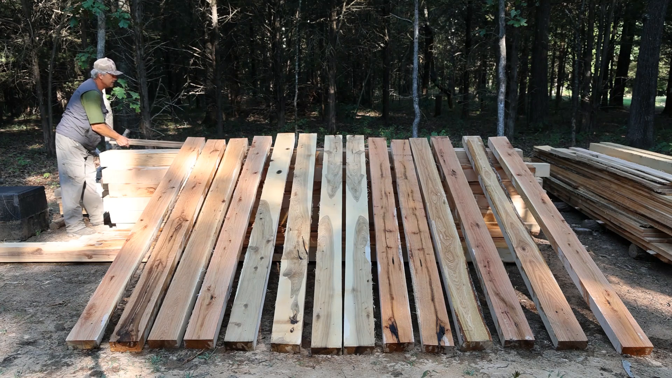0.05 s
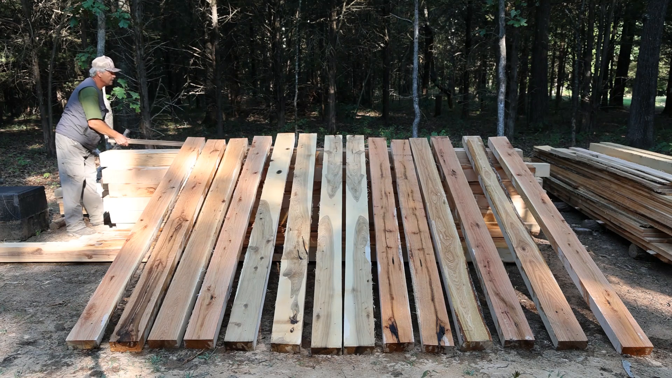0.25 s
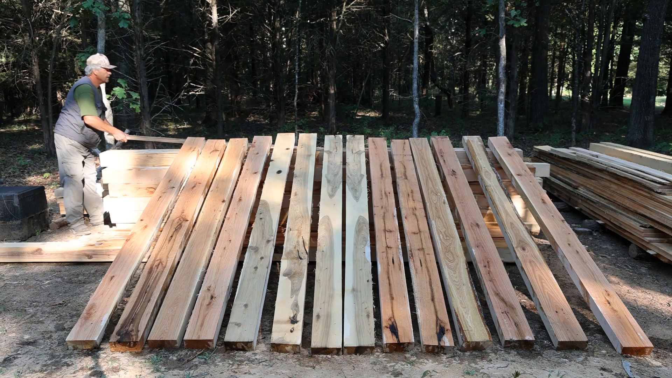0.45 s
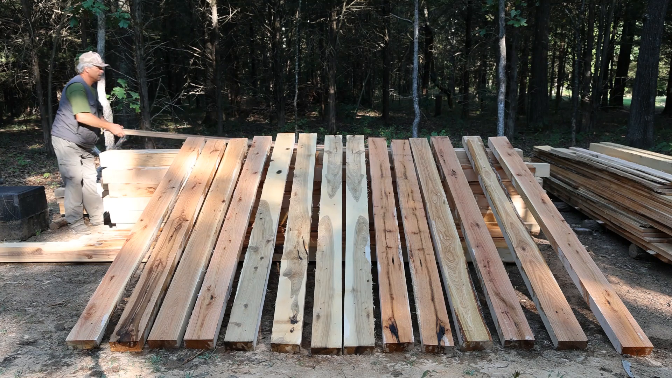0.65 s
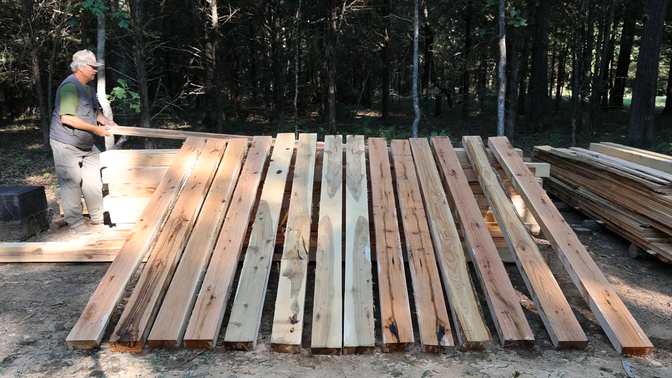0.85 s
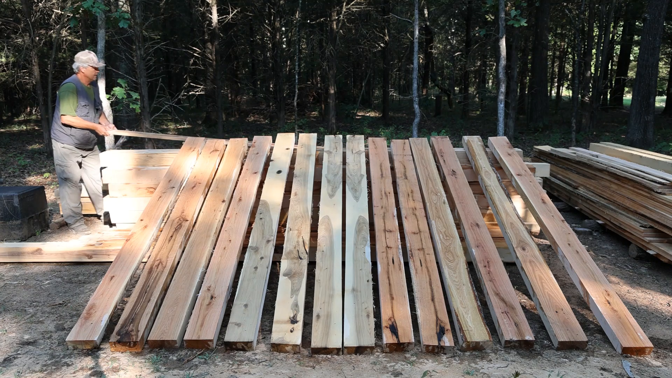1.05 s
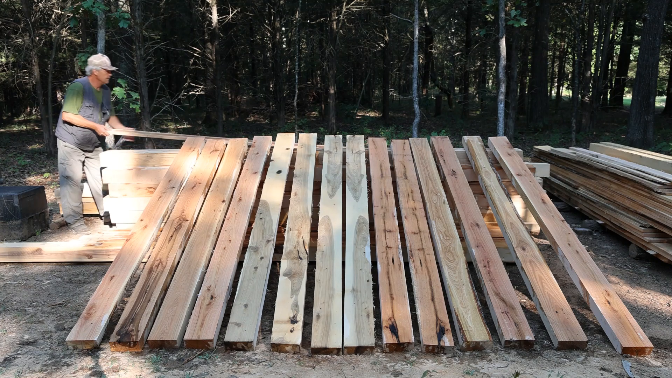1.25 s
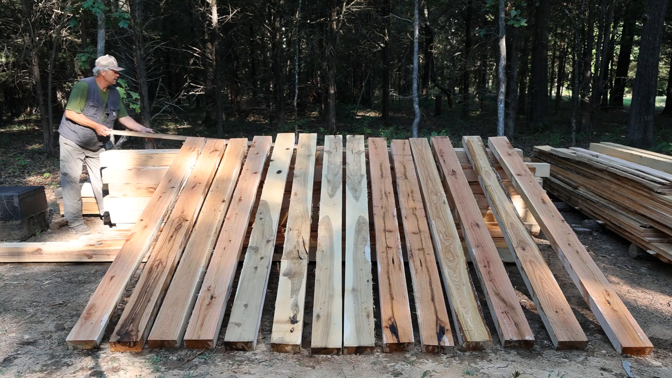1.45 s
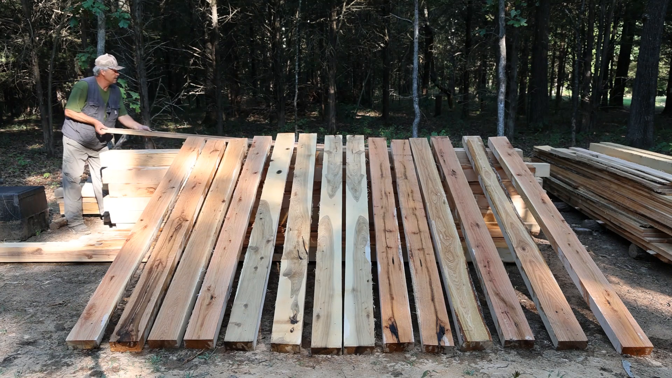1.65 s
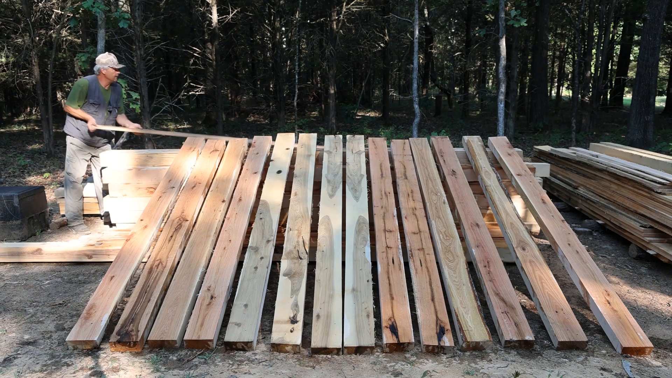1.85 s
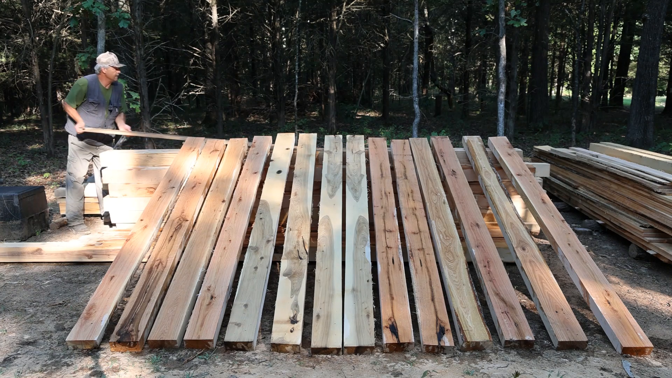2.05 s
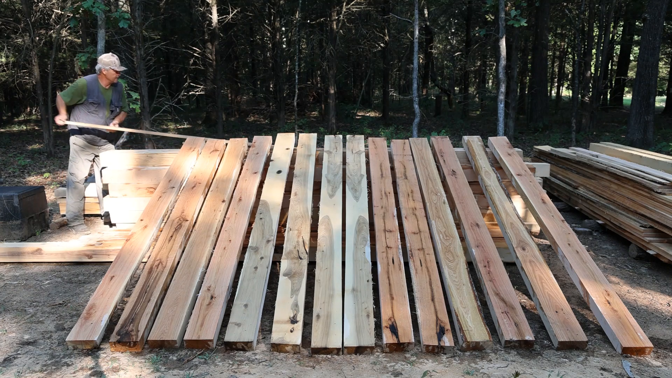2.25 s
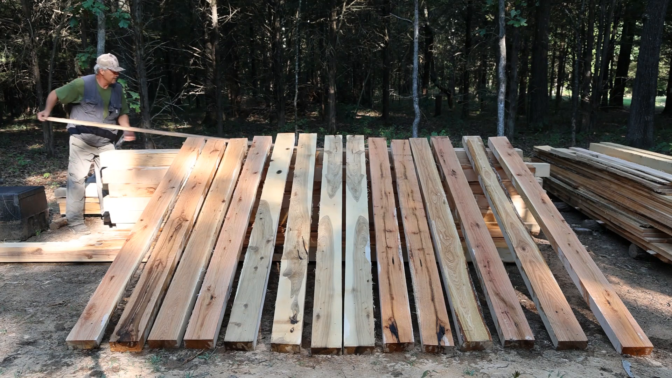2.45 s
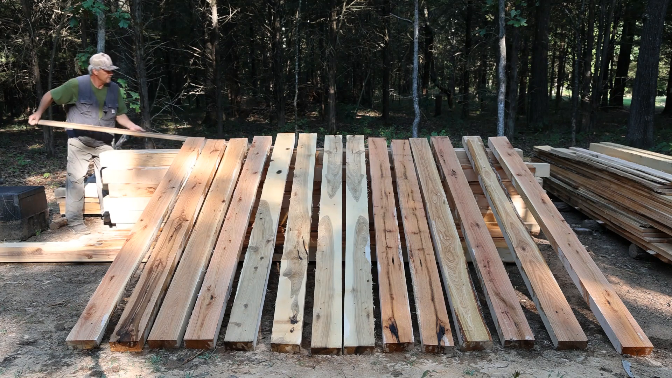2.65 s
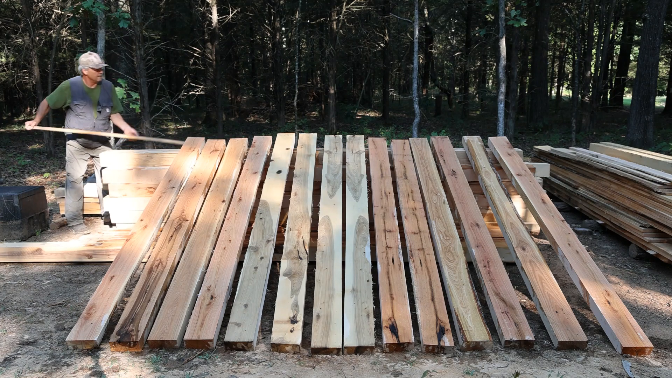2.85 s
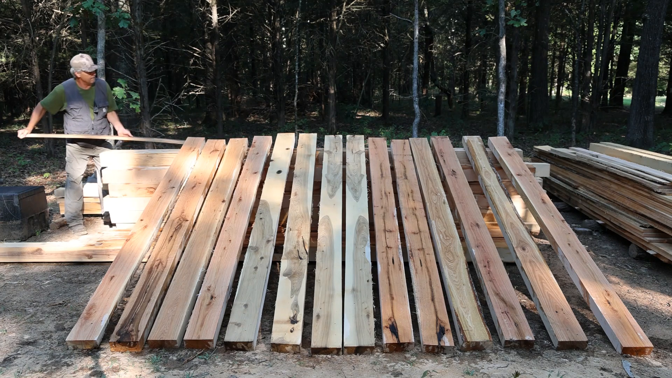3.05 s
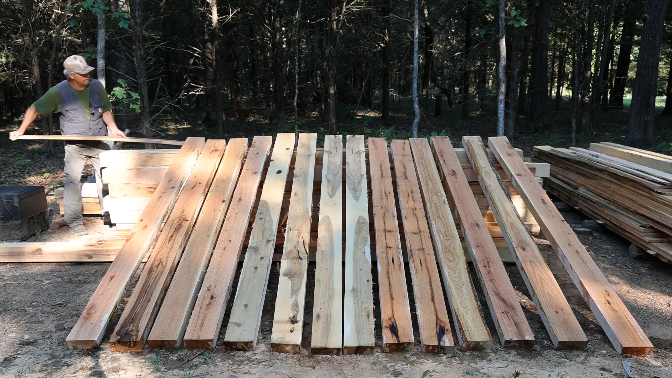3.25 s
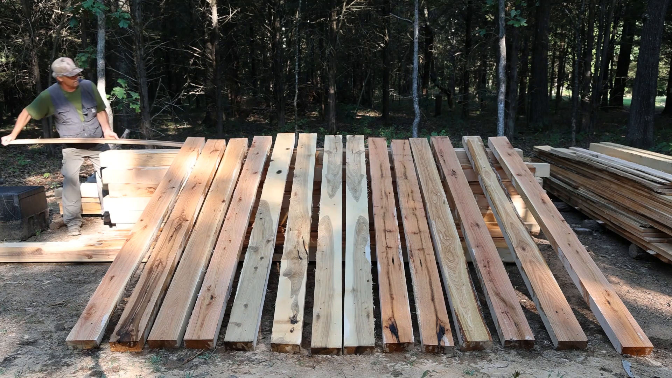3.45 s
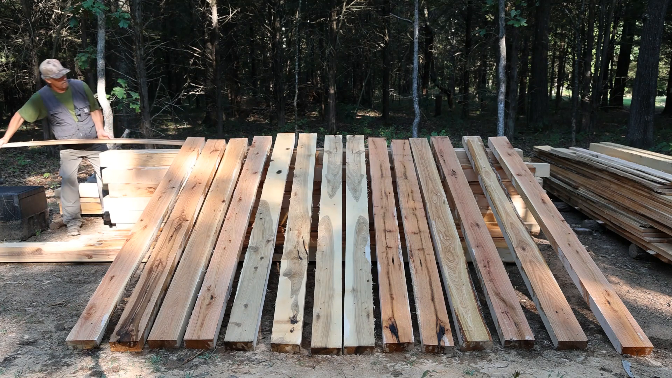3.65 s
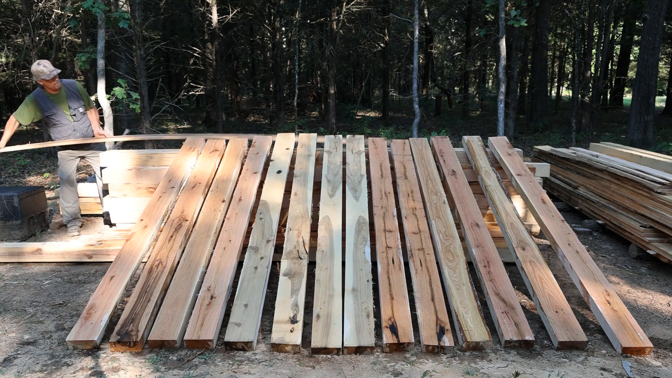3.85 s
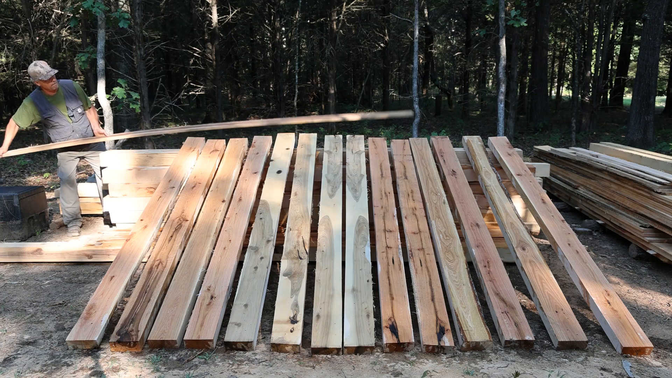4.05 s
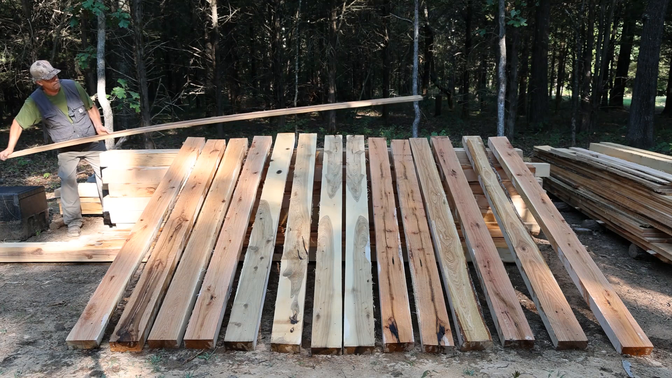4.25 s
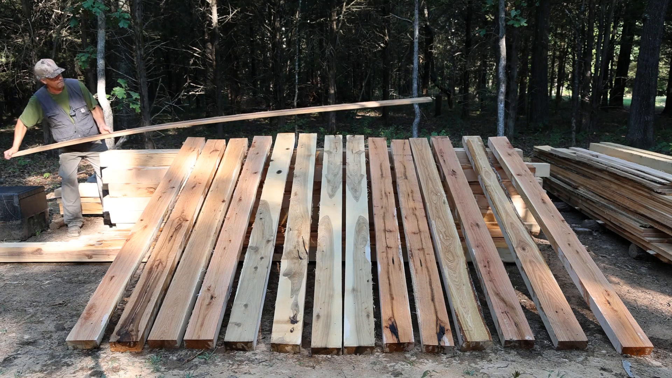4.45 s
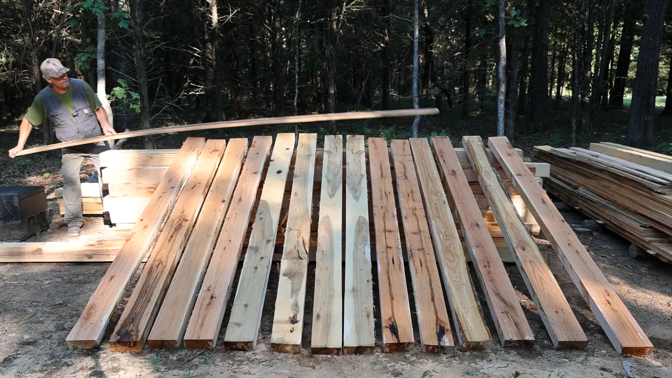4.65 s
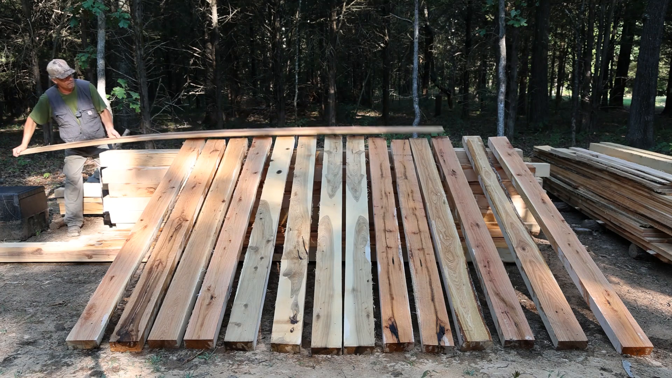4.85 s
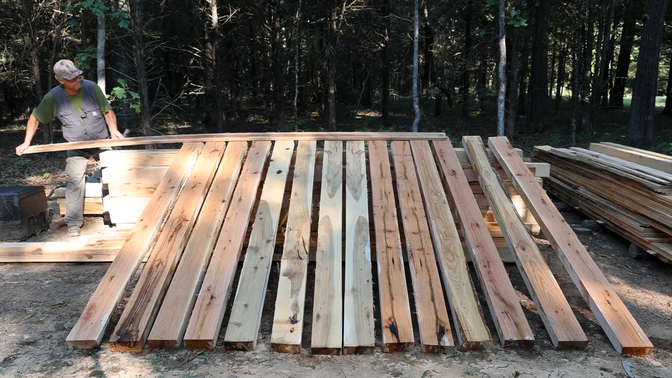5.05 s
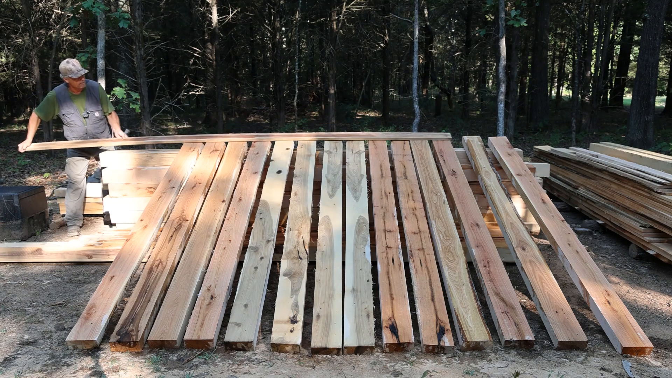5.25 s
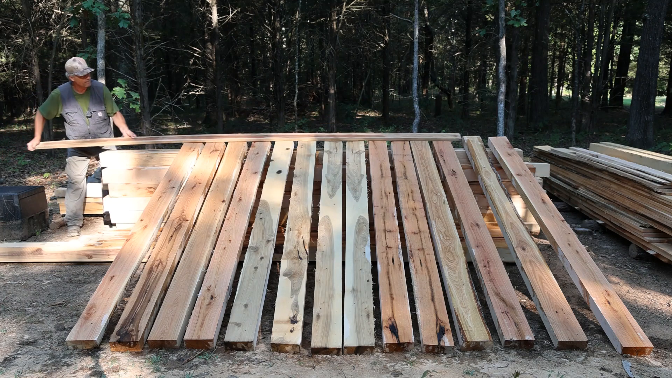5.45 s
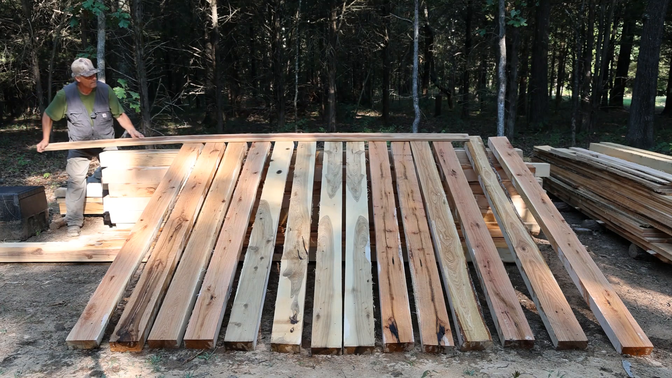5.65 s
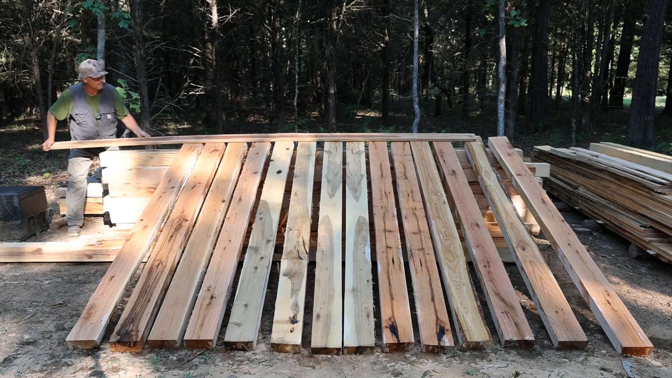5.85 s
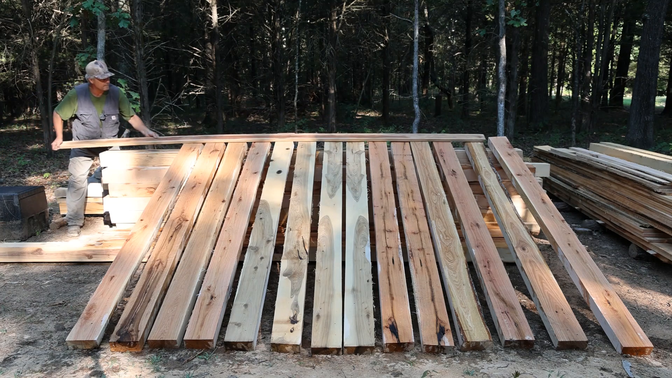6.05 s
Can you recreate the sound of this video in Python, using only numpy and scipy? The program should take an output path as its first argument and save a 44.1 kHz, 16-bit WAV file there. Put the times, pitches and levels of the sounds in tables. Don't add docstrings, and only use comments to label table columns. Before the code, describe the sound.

Faint handling taps come first, among buzzing cicadas. Then a plank is pulled across a lumber stack with gritty scraping, and a sharp loud clack lands, followed by more rasping and a second, heavier clattering bang. Handling grows quiet while insects swell again; a third knock bounces woodenly and ends in a drawn-out drag. Open air at a forest edge, one microphone, little reverberation, soft insect echo from the trees.

```python
import sys
import numpy as np
from scipy import signal
from scipy.fft import rfft, irfft, next_fast_len
from scipy.io import wavfile
from scipy.ndimage import uniform_filter1d, map_coordinates

SR = 44100
rng = np.random.default_rng(int(sys.argv[2]) if len(sys.argv) > 2 else 0)


def generate_wav(sig):
    pcm = np.round(np.clip(np.atleast_2d(sig).T, -1, 1) * 32767).astype(np.int16)
    wavfile.write(sys.argv[1], SR, pcm)


def volts_from_decibels(level):
    exponent = np.asarray(level, float) / 20
    return 10 ** exponent


N = 269274
TIME_S = np.arange(N) / SR

OVERHANG_CHANGES_S = [2.6, 4.0]
# time in seconds, speed as level in dB, weight on the stack in dB.
STROKES = [
    [(1.62, -64.5, -6), (1.69, -53, -2), (1.76, -48, 2), (1.83, -48, 3.5), (1.875, -54.5, 12),
     (1.95, -48, 7), (2.0, -49, 0), (2.05, -50, -2)],
    [(2.05, -53, -12), (2.09, -39, -7), (2.16, -45, -1.5), (2.26, -45.5, -5), (2.33, -44, 4),
     (2.41, -41.5, -7), (2.52, -44.5, 0), (2.66, -50.5, 0.5), (2.76, -57.5, 1), (2.835, -56.5, 9)],
    [(2.86, -58, -5), (2.92, -46.5, 24), (2.96, -41, -5), (3.0, -37.5, -16), (3.05, -41.5, -4),
     (3.1, -51.5, 2), (3.15, -55, 1)],
    [(5.08, -52, 10), (5.17, -57.5, 21), (5.24, -46.5, -2), (5.4, -46.5, -5), (5.56, -42, -4.5),
     (5.64, -39, -2), (5.8, -46.5, -1.5), (5.9, -42, -5), (6.11, -39, -6.5)],
]
# time in seconds, speed as level in dB, weight in dB.
SHIFTS = [
    [(.5, -73, 2), (.6, -65.5, -6), (.8, -57.5, 3), (.92, -83, 0.5)],
    [(3.44, -60.5, -2), (3.55, -56.5, 0), (3.66, -58, 3.5), (3.78, -68, 8)],
]


def strokes(overhang):
    own = []
    for rows in sorted(STROKES + SHIFTS):
        if np.searchsorted(OVERHANG_CHANGES_S, rows[0][0]) == overhang:
            own.append(rows)
    s, _, weight_db = np.transpose(np.vstack(own))
    speed = sum(volts_from_decibels(in_time(rows)[0]) for rows in own)
    return speed, np.interp(TIME_S, s, weight_db)


# frequency in Hz, width in Hz, level in dB.
HISS_MODES = [
    [(591, 80, -4), (756, 147, -2.5), (920, 134, -1), (1000, 61, 1), (1226, 270, -6)],
    [(625, 290, -2), (863, 194, 1), (1050, 240, -0.5), (1400, 170, -13)],
    [(554, 130, -6), (702, 54, 2), (800, 106, 0), (940, 65, 1), (1075, 94, 1), (1400, 480, -6)],
]
RUMBLE_MODES = [
    [(110, 19, 2.5), (189, 45, -2), (284, 40, -3.5), (400, 48, -4)],
    [(70, 48, 2.5), (200, 140, -2), (350, 71, -6.5)],
    [(204, 47, -2), (303, 36.6, 1.5), (450, 78, -7)],
]
RASP_MODES = [
    [(1540, 125, 2), (1730, 102, 4.5), (1920, 190, 4.5), (2290, 730, 2), (2960, 1050, -2.5)],
    [(1600, 240, 0.5), (2000, 270, 0), (2520, 560, -6)],
    [(1667, 170, 0.33), (1990, 360, 0.79), (2560, 340, -0.74)],
]
RASP_DB = [0.5, -4.5, -7]
RUB_DB = [-4, -4, -5]
# frequency in Hz, density in dB per Hz.
RUB_SPECTRUM = [(60, -29), (120, 0.5), (300, -2), (600, -6), (1500, -8.5), (2300, -13), (3000, -8),
                (4200, -12.5)]


def slides(motion):
    rasp_loss = 0.063
    fibres = foliage(grit(5000, 1.6) * volts_from_decibels(drift(45)), depth_db=.8, spacing_hz=120, per_s=5)
    rub = uniform_filter1d(sum(volts_from_decibels(db) * speed for db, (speed, _) in zip(RUB_DB, motion)), 3000)
    out = rub * coloured(np.roll(fibres, SR), RUB_SPECTRUM)
    for (speed, weight_db), hiss_modes, rumble_modes, rasp_modes, rasp_db in zip(
            motion, HISS_MODES, RUMBLE_MODES, RASP_MODES, RASP_DB):
        hiss = resonate(resonate(fibres, hiss_modes), hiss_modes)
        rumble = volts_from_decibels(weight_db) * resonate(fibres, rumble_modes)
        rasp = resonate(resonate(fibres, rasp_modes), rasp_modes)
        out = out + speed * (hiss + rumble)
        out = out + speed * volts_from_decibels(rasp_db - rasp_loss * weight_db) * rasp
    return out


# start in seconds, peak level in dB, crack pitch in Hz,
# ring relative to peak in dB, thud relative to peak in dB.
DROPS = [(1.8891, 7, 1920, -23.5, -30), (1.9025, -9, 1000, -15.5, -13.5), (2.018, -21.5, 730, -17, -36),
         (2.037, -29, 503, -16, -3), (2.8358, 6, 1620, -21.5, -19.5), (2.8356, -10.5, 3010, -16, -31),
         (2.8445, -14, 1980, -17.5, -9), (2.851, -19, 856, -9.5, -12), (2.876, -14, 800, -24, -6.5),
         (2.8822, -16.5, 1900, -16, -10), (2.8945, -9.5, 940, -18, -14), (2.9478, -6, 960, -26, -19.5),
         (4.998, -7, 1320, -16, -19), (5.001, 3, 1144, -20, -45), (5.010, -6, 1000, -10.5, -15),
         (5.0222, -3.5, 1160, -18, -12.5), (5.041, -19, 911, -7.5, -14), (5.138, -31.5, 1050, -6, 0),
         (5.149, -16.5, 653, -22, -10), (5.253, -28.5, 230, -18, -7)]
# start in seconds, peak level in dB, crack pitch in Hz,
# ring relative to peak in dB, thud relative to peak in dB.
TAPS = [(0.572, -38, 493, -12, -7), (0.779, -43.5, 700, -7, -11), (.83, -48, 706, -10, 2),
        (0.949, -58, 500, -14, 1), (1.84, -23.5, 1970, -25.5, -39), (1.867, -27, 1900, -24, -22),
        (2.079, -50, 900, -8, -13), (2.288, -38, 1790, -7, -35), (2.434, -34, 970, 5, -41),
        (2.45, -28.5, 1110, -9.5, -16), (2.774, -28, 1000, -17, -7.5), (3.233, -32.5, 1400, -16, -5.5),
        (3.457, -27.5, 161, -14, -5), (3.652, -54.5, 400, 0, 2), (4.149, -45.5, 896, -15, -4.5),
        (5.614, -27.5, 920, -12.5, -5)]
# start in
# seconds, peak level in dB, crack pitch in Hz, ring relative to peak in dB, thud relative to peak in dB.
RATTLE = [(2.856, -24, 1900, -20, -15), (2.863, -19.5, 610, -9, -4.5), (2.872, -22.5, 300, -13, -2.5),
          (2.8838, -12, 624, -14, -10), (2.909, -23, 905, -14, -7), (2.919, -22, 610, -20, -13),
          (2.932, -36, 350, -14, -12), (5.016, -11, 535, -10, -20), (5.031, -13, 800, -19, -16),
          (5.052, -26, 1000, -18, -10), (5.068, -23.5, 700, -19, -0.5), (5.086, -26.5, 400, -11, -1),
          (5.097, -33, 350, -10, -7), (5.122, -32, 450, -5, 0), (5.156, -25.5, 450, -14, -5),
          (5.168, -28.5, 600, -11.5, -5), (5.196, -33, 305, -15, 1), (3.487, -35, 151, -20, -16),
          (1.9105, -18.5, 260, -20, -10.5), (1.916, -27, 200, -18, -14), (1.93, -28, 400, -11, -16),
          (2.8372, -5, 800, -17.5, -21), (2.8525, -17, 380, -16, -12.5), (2.8875, -9.5, 299, -22, -14),
          (1.092, -52, 600, -8, -10), (1.253, -49, 900, -7, -6), (1.52, -46.5, 600, -6, -3),
          (5.1435, -24, 700, -14, -15)]
# frequency in Hz, level in dB.
MODES_SHORT = [(305, -14), (410, -12), (475, -13), (615, -42), (684, -11), (775, -22.5), (834, -4),
               (915, 2), (1001, 7), (1077, -11), (1567, -13), (1680, -1), (1965, -19)]
MODES_HALF = [(253, -6.5), (360, -13), (480, -22), (620, -1), (680, 0.5), (760, 4), (818, -0.5),
              (900, -4.5), (1168, -2.5), (1448, -16), (1556, -15), (1943, 0), (2153, -9), (2492, -15)]
MODES_FULL = [(208, -10), (275, -28), (330, -9.5), (425, -9), (540, -8.5), (618, -1), (680, -7.5),
              (748, 3.5), (812, 0.5), (916, 2.5), (1070, 7), (1137, 5), (1238, -8), (1400, -21),
              (1520, -10), (1658, -5), (1850, 4), (2342, -5.5)]
RING_T60_S = [0.065, 0.057, 0.061]
# multiple of the crack pitch, level in dB.
CRACK_PARTIALS = [(2.5, -50.5), (1.9, -36), (1.35, -11.5), (1.01, 6.5), (.72, -7), (.47, 2.5), (.3, 1)]
# frequency in Hz, level in dB, decay time in seconds.
STACK_MODES = [(45.7, -7.5, 0.19), (64.8, -2, 0.103), (122, -8.5, 0.12), (183.5, -10.5, 0.18),
               (218, 0.5, 0.065), (246, -11.5, 0.21), (312, -6, 0.11), (400, -16.5, 0.18)]


def knocks(contacts):
    scatter_db, filler_db, crack_cycles = 4, -9.5, 10
    heft = 0.2
    out, t = np.zeros(N + SR), np.arange(SR // 3) / SR
    short = t[:SR // 9]
    luck = rng.standard_normal((len(contacts), 80))
    for (s, peak_db, crack_hz, ring_db, low_db), draw in zip(contacts, luck):
        overhang = np.searchsorted(OVERHANG_CHANGES_S, s)
        named = np.array((MODES_SHORT, MODES_HALF, MODES_FULL)[overhang])
        fill_hz = np.geomspace(350, 3200, 30) * np.exp(0.016 * draw[50:])
        hz = np.r_[named[:, 0], fill_hz]
        contact_db = -10 * np.log10(1 + (hz / (1.2 * crack_hz)) ** 4)
        db = np.r_[named[:, 1], np.full(30, filler_db)] + contact_db + ring_db
        damping = np.minimum(1000 / hz, (1000 / hz) ** 0.68)
        decay_s = RING_T60_S[overhang] * damping + .004
        body = struck(np.c_[hz, db, decay_s], scatter_db * draw, short, lag_s=0.002057, rise=0.41)

        partials = [(crack_hz * k, level_db, crack_cycles / crack_hz / k ** 0.43)
                    for k, level_db in CRACK_PARTIALS]
        crack = struck(partials, 0 * draw, short, lag_s=0.001727, rise=0.98)

        stack = np.array(STACK_MODES)
        stack[:2, 1] += heft * (peak_db + 21)
        thud = struck(stack, scatter_db * draw[20:], t, lag_s=0.00208, rise=0.22)

        at = round(s * SR) - 40
        out[at:at + len(short)] += volts_from_decibels(peak_db) * (crack + body)
        out[at:at + len(t)] += volts_from_decibels(peak_db + low_db) * thud
    return out[:N]


def struck(modes, luck_db, t, lag_s, rise):
    hz, db, t60 = (c[:, None] for c in np.transpose(modes))
    late = np.maximum(t - lag_s * np.sqrt(1000 / hz), 0)
    swell = (1 - np.exp(-late * hz / rise)) ** 2
    decay = np.exp(-np.log(1000) * late / t60)
    gain = volts_from_decibels(db + luck_db[:len(hz), None])
    return np.sum(gain * decay * swell * np.sin(2 * np.pi * hz * late), axis=0)


# start in seconds, length in seconds, frequency in Hz, width in Hz, level in dB.
SQUEAKS = [(1.704, .16, 1000, 44, -42), (1.72, 0.1304, 925, 41, -43.5), (1.71, .15, 1800, 120, -53),
           (2.1, 0.18, 1100, 33, -45.5), (2.375, 0.11, 1000, 23, -35.5), (2.07, 0.28, 2040, 60, -47.5),
           (2.24, .17, 1840, 65, -46), (2.43, 0.14, 1750, 70, -47), (2.147, 0.15, 183, 40, -41.5),
           (2.4, 0.081, 120, 34, -46.5), (2.32, 0.12, 400, 28, -45), (2.49, .12, 770, 67, -48),
           (2.44, 0.26, 280, 53, -51), (2.96, 0.077, 1220, 130, -40), (3.24, 0.135, 54, 16, -47),
           (3.5, 0.063, 88, 70, -45), (1.83, .05, 59, 40, -45), (5.62, 0.074, 73, 46, -44),
           (5.273, 0.36, 1330, 82, -49), (5.5, 0.58, 886, 200, -47), (6.6, .3, 800, 90, -44),
           (5.7, 0.49, 1170, 33, -49), (6, 0.62, 1136, 150, -51), (5.49, .15, 1070, 47, -47),
           (5.594, 0.077, 302, 39, -36.5), (5.667, 0.095, 295, 25, -46), (5.796, 0.095, 220, 32, -42.5),
           (5.89, 0.27, 307, 19, -45.5), (5.711, 0.22, 1000, 48, -44.5), (5.73, 0.27, 750, 59, -49),
           (5.3, 0.15, 1070, 72, -43), (5.95, 0.12, 2300, 150, -48)]


def squeaks():
    out, fibres = np.zeros(N + SR), grit(3000, 3.6)
    warm_up = 4000
    for s, length_s, hz, width, level_db in SQUEAKS:
        at, size = round(s * SR), round(length_s * SR)
        mode = [(hz, width, 0)]
        clicks = np.roll(fibres, -at)[:size + warm_up]
        tone = resonate(resonate(clicks, mode), mode)[warm_up:]
        out[at:at + size] += volts_from_decibels(level_db) * np.hanning(size) ** .5 * tone
    return out[:N]


# start in seconds, peak level in dB, brightness in Hz.
TICKS = [(1.8898, -34, 5000), (2.8372, -34, 15000), (2.8828, -36, 2600), (2.9485, -34, 2200),
         (5.0012, -28, 3930), (5.006, -29, 2860), (5.013, -32, 2700), (2.8358, -19.5, 4000),
         (2.841, -28, 3600), (2.846, -26, 3200), (2.8965, -32, 2600), (5.0238, -34, 3820),
         (5.0425, -42, 2800), (5.1438, -40, 1600)]


def ticks():
    decay_s = .0012
    out, t = np.zeros(N), np.arange(SR // 100) / SR
    for (s, db, hz), noise in zip(TICKS, rng.standard_normal((len(TICKS), len(t)))):
        octave = signal.butter(3, [hz / 2, hz], "band", fs=SR, output="sos")
        snap = signal.sosfilt(octave, noise * np.exp(-t / decay_s))
        at = round(s * SR)
        out[at:at + len(t)] += volts_from_decibels(db) * snap / abs(snap).max()
    return out


# start in seconds, full in seconds, stop in seconds, level in dB.
CICADA_SWELLS = [
    (0.501, 0.794, 1.07, -44.5),
    (1.92, 2.167, 2.34, -42),
    (3.02, 3.287, 3.54, -44),
    (4.198, 4.485, 4.728, -43),
    (5.122, 5.44, 5.72, -45.5),
]


def swells():
    onset_s, swell_db = .09, -10
    cut_s, cut_db = .03, -10
    fade_s, fade_db = .14, -22
    curves = []
    for start, full, stop, db in CICADA_SWELLS:
        rise = [(start - onset_s, db + fade_db), (start, db + swell_db), (full, db)]
        fall = [(stop, db), (stop + cut_s, db + cut_db), (stop + cut_s + fade_s, db + fade_db)]
        curves.append(rise + fall)
    return curves


# frequency in Hz, density in dB per Hz.
CICADA_SPECTRUM = [(1760, -99.5), (3000, -42.5), (3290, -44), (3580, -22), (3910, -4), (4610, -11),
                   (4900, -2.5), (5280, -11.5), (5700, 1.5), (6110, 6.5), (6600, 1), (7400, -0.5),
                   (8570, -2.5), (9620, -19), (13000, -20)]


def near_cicada():
    second_db, burst_ms, blur, repeat = -9, 4.5, .35, 1.3
    start_hz, end_hz, top_hz = 68, 83, 77.3
    ribs_rise = .07
    level, turns_hz, pitch = 0, np.full(N, 70.), np.ones(N)
    for rows in swells():
        level = level + volts_from_decibels(in_time(rows)[0])
        first, last = round(rows[0][0] * SR), round(rows[-1][0] * SR)
        turns_hz[first:last] = np.minimum(np.linspace(start_hz, end_hz, last - first), top_hz)
        pitch[first:last] = np.linspace(1 - ribs_rise, 1, last - first)
    cycle_ms = (np.cumsum(turns_hz / SR) % 1) * 1000 / turns_hz
    half_ms = cycle_ms - 500 / turns_hz
    first_tymbal = np.exp(-cycle_ms / burst_ms)
    second_tymbal = volts_from_decibels(second_db) * np.exp(-np.maximum(half_ms, 0) / burst_ms) * (half_ms > 0)
    pattern = np.interp(cycle_ms * pitch * SR / 2000, np.arange(1000), rng.standard_normal(1000))
    clicks = repeat * pattern + rms_one(grit(6000, 4.5))
    ribs = rms_one(clicks * (first_tymbal + second_tymbal)) + blur * rng.standard_normal(N)
    song = foliage(coloured(ribs, CICADA_SPECTRUM), depth_db=4, spacing_hz=203.6, per_s=1.572)
    return volts_from_decibels(6.5) * level * song


# time in seconds, throbs so far.
THROB_COUNT = [(.068, 0), (.931, 8), (1.762, 16), (2.535, 24), (3.185, 32), (3.777, 40), (4.335, 48),
               (4.875, 56)]
# time in seconds, level in dB, frequency in Hz.
THROB_COURSE = [(0, -36, 3900), (.5, -34.5, 3700), (.68, -34.5, 3930), (1.2, -32.5, 4080),
                (1.8, -41.5, 3450), (1.97, -63, 3610), (2.3, -39, 3350), (2.8, -37.5, 3370),
                (2.92, -58, 3380), (3.05, -36, 3370), (3.6, -39, 3424), (4.1, -40, 3100), (4.33, -70, 3200),
                (4.42, -80.5, 3263), (4.74, -84, 3295), (4.81, -47, 3330), (4.9, -50, 3340)]
# frequency in Hz, width in Hz.
THROB_MODES = [(2600, 28), (2800, 27), (3350, 150), (3850, 54)]
TURN_FLOOR_DB = [-14, -12.5, -9.5, -44]
THROB_STEADY = [.05, .05, 0.28, 0.34]


def throbbing_cicada():
    duty, turn_db_per_octave = 0.3, 70
    s, count = np.transpose(THROB_COUNT)
    beat = np.interp(TIME_S, s, count, left=-.5, right=-.5)
    level_db, best_hz = in_time(THROB_COURSE)
    pulse = np.exp(-((beat - np.round(beat)) / duty) ** 4)
    buzz, out = grit(3000, 4.3), 0
    octave = np.log2(np.maximum(best_hz, 1))
    for (hz, width), floor_db, steady in zip(THROB_MODES, TURN_FLOOR_DB, THROB_STEADY):
        facing = volts_from_decibels(floor_db) + volts_from_decibels(-turn_db_per_octave * abs(octave - np.log2(hz)))
        throb = pulse + steady * (1 - pulse)
        out = out + facing * throb * resonate(buzz, [(hz, width, 0)])
    return volts_from_decibels(level_db - 10.5) * out


# time in seconds, level in dB.
CHORUS_COURSE = [(0, -39), (.5, -39.5), (1.2, -39), (2.4, -39.5), (3.0, -41), (3.6, -40.5), (4.2, -43.5),
                 (4.74, -45.5), (4.86, -50), (5.15, -52.5), (6.11, -50.5)]
# frequency in Hz, density in dB per Hz.
CHORUS_SPECTRUM = [(1350, -53), (2300, -36), (2530, -22.5), (3010, -13), (3330, -6.5), (4620, -5),
                   (4830, -3), (5450, -2), (6170, 3), (6770, -4), (7290, -3.5), (8260, -12.5),
                   (9000, -12.5), (11700, -40.5), (19800, -120)]
FRINGE_SPECTRUM = [(5000, -43), (8500, -6), (9960, -2), (12300, -3.5), (14900, -9), (16000, -35)]
AIR_SPECTRUM = [(12, -46), (20, 0.5), (72, 3), (114, -6), (228, -7.5), (376, -11), (409, -11), (1570, -16),
                (2190, -16), (3000, -8.5), (3900, -21), (6600, -120)]


def background():
    far = volts_from_decibels(np.interp(TIME_S, *np.transpose(CHORUS_COURSE)))
    near = sum(volts_from_decibels(in_time(rows)[0]) for rows in swells())
    echo = volts_from_decibels(3.5) * uniform_filter1d(near, 2000)
    level = np.hypot(far, echo)
    banded = foliage(coloured(grit(9000, 1.5), CHORUS_SPECTRUM), depth_db=5, spacing_hz=70, per_s=4.5)
    chorus = banded * level * volts_from_decibels(0.47 * drift(40))

    fringe_db = -54.5 - 1.0 * TIME_S + 1.45 * drift(7)
    follow = (level / level.mean()) ** 0.36
    fringe = coloured(grit(9000, 1.5), FRINGE_SPECTRUM) * follow * volts_from_decibels(fringe_db)

    air_db = -52.5 - 0.49 * TIME_S + 1.35 * drift(16)
    air = coloured(rng.standard_normal(N), AIR_SPECTRUM) * volts_from_decibels(air_db)
    breeze = resonate(rng.standard_normal(N), [(55, 50, 0)]) * volts_from_decibels(-66 + 3 * drift(7))
    return chorus + fringe + air + breeze


def foliage(x, depth_db, spacing_hz, per_s):
    hz, s, cells = signal.stft(x, SR, nperseg=1024)
    where = np.meshgrid(hz / spacing_hz, s * per_s, indexing="ij")
    bands = map_coordinates(rng.standard_normal((400, 60)), where, order=1, mode="wrap")
    gain = volts_from_decibels(depth_db * bands / (1 + (hz[:, None] / 9500) ** 4))
    return rms_one(signal.istft(cells * gain, SR, nperseg=1024)[1][:N])


def grit(per_s, spread_db):
    sizes = volts_from_decibels(spread_db * np.minimum(rng.exponential(1, N), 4)) * rng.choice([-1, 1], N)
    return sizes * (rng.random(N) < per_s / SR) + 1e-9


def resonate(x, peaks):
    out = 0
    for k, (hz, width, db) in enumerate(peaks):
        r = np.exp(-np.pi * width / SR)
        poles = [1, -2 * r * np.cos(2 * np.pi * hz / SR), r * r]
        out = out + (-1) ** k * volts_from_decibels(db) * signal.lfilter([1 - r * r, 0, r * r - 1], poles, x)
    return rms_one(out)


def coloured(x, spectrum):
    hz, db = np.transpose(spectrum)
    size = next_fast_len(N, True)
    grid = np.maximum(np.arange(size // 2 + 1) * SR / size, 1)
    gain = volts_from_decibels(np.interp(np.log(grid), np.log(hz), db, left=-90, right=-90))
    return rms_one(irfft(rfft(x, size) * gain, size)[:N])


def drift(rate):
    knots = rng.standard_normal(2000)
    return np.interp(TIME_S * rate, np.arange(2000), knots) * 1.22


def in_time(rows):
    s, *columns = np.transpose(rows)
    return [np.interp(TIME_S, s, c, left=-120, right=-120) for c in columns]


def rms_one(x):
    return x / np.sqrt(np.mean(x ** 2) + 1e-20)


def scene():
    board = slides([strokes(k) for k in range(3)]) + knocks(sorted(DROPS + TAPS)) + knocks(RATTLE)
    board = board + squeaks() + ticks()
    mono = board + near_cicada() + throbbing_cicada() + background()
    return np.array([mono, mono])


def gain_control(x):
    limit_db, recover_db_per_s = -1.5, 158.5
    climb = recover_db_per_s * TIME_S
    over_db = np.maximum(20 * np.log10(abs(x[0]) + 1e-9) - limit_db, 0)
    held_db = np.maximum.accumulate(over_db + climb) - climb
    return x * volts_from_decibels(-.6 * uniform_filter1d(held_db, size=180, origin=30))


def top_cut(x):
    return signal.sosfilt(signal.butter(12, 15730, fs=SR, output="sos"), x)


# frequency in Hz, density in dB per Hz.
SIDE_HISS_SPECTRUM = [(30, 12), (300, 8.5), (1000, 3.5), (3000, 0.5), (8000, -3), (16000, -6)]


def record(dry):
    hiss = volts_from_decibels(-68) * coloured(rng.standard_normal(N), SIDE_HISS_SPECTRUM) * volts_from_decibels(3.5 * drift(14))
    heard = gain_control(dry) + hiss * [[1], [-1]]
    mix = np.clip(2.5 * np.tanh(heard / 2.5), -.945, .945)
    return top_cut(mix)


dry = scene()
out = record(dry)
generate_wav(out)
```